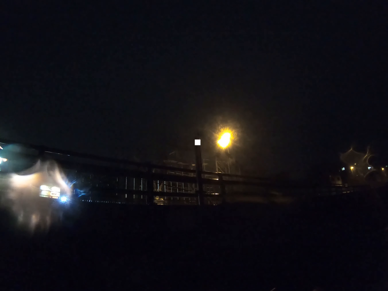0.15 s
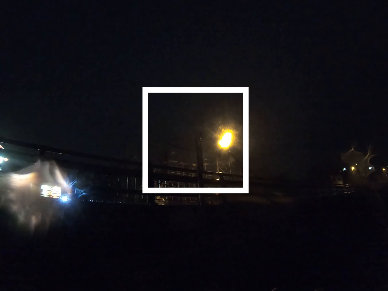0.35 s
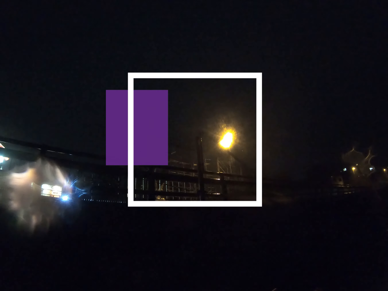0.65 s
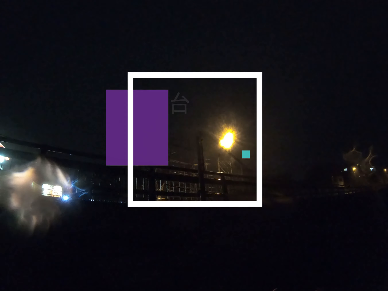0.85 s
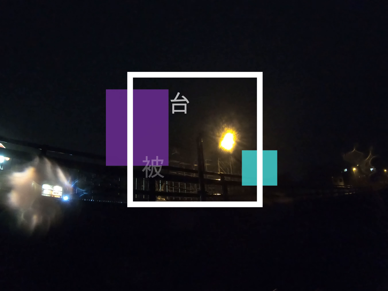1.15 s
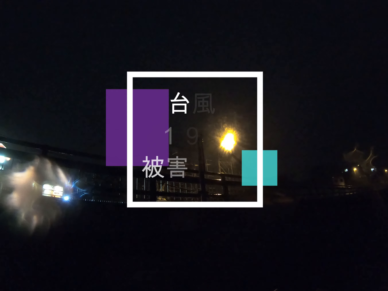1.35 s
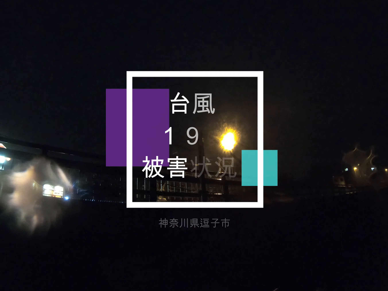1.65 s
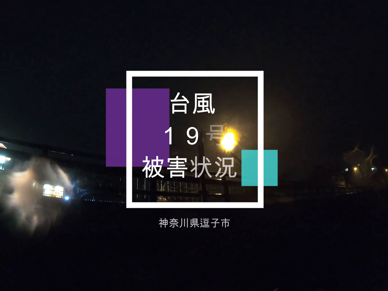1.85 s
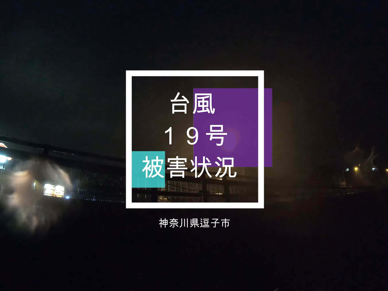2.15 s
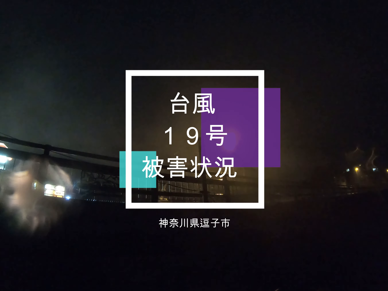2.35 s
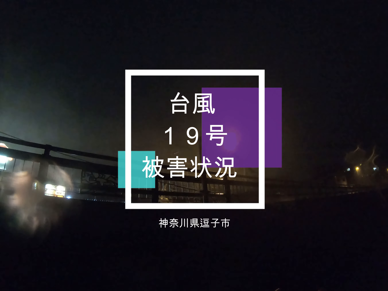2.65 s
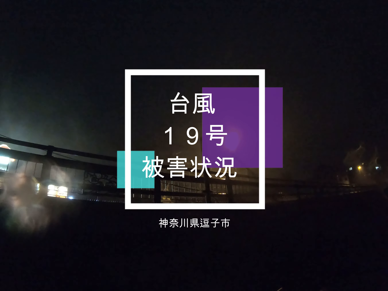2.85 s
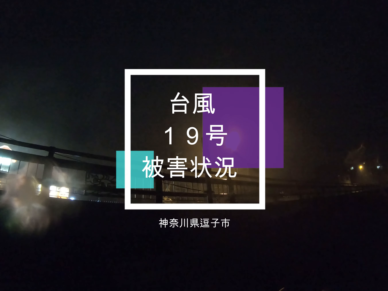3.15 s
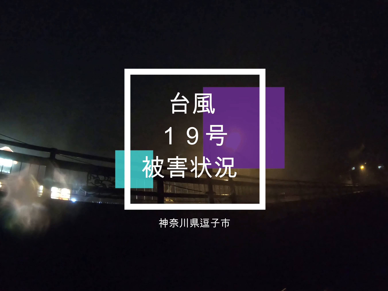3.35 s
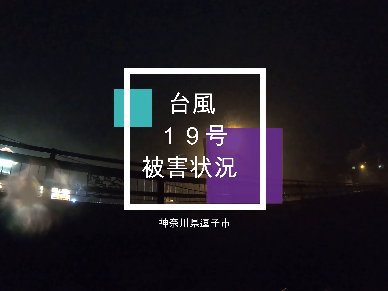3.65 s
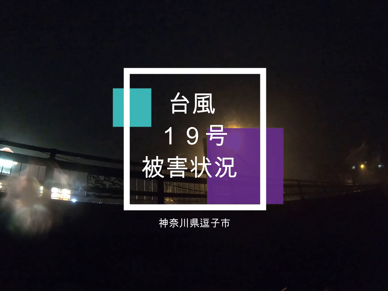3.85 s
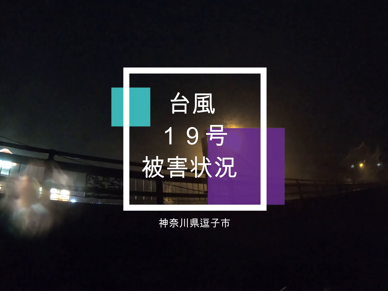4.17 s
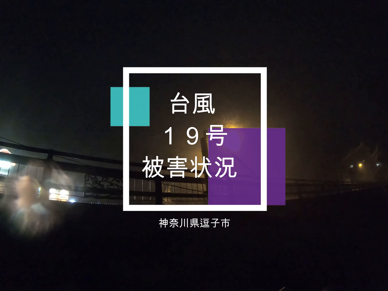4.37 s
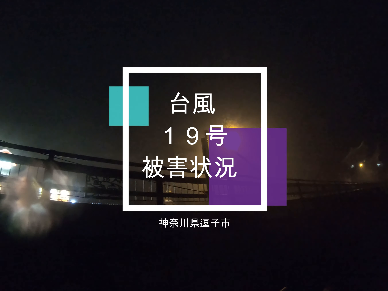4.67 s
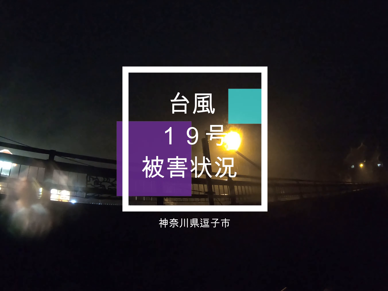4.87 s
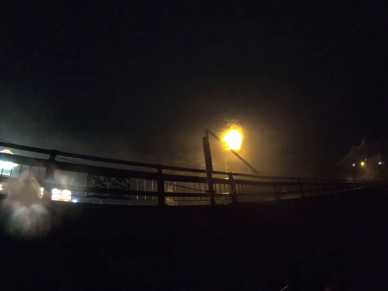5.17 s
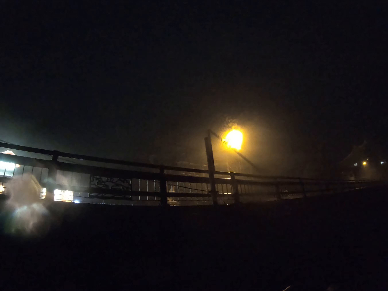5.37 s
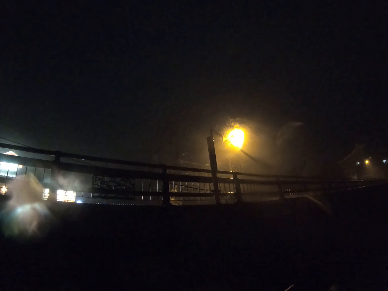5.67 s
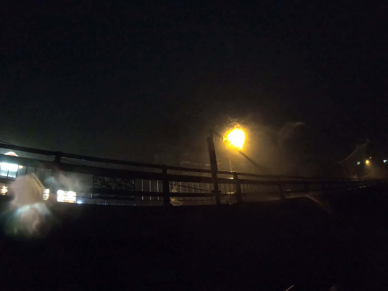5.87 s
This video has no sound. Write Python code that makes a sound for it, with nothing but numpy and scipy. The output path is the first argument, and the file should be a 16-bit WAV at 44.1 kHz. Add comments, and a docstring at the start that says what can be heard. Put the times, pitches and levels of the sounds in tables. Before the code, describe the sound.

Close, rough wind noise dominates: low booming buffets, irregular thuds and torn, crackling gust peaks right on the microphone. Between the blasts, a breathy two-toned howl rises and sinks in nearby rails, with a broad roar and a soft wash of rain and fine spray. A few tiny drops tick on the housing. Open, exposed place, no echo.

```python
"""Heavy low rumble: a typhoon buffets a microphone beside a railing in the open.
Large eddies are shaped noise and short uneven sine bursts; ragged blasts tear across the port as
noise thumps with rasp and crackle on their crests. Behind them two fuzzy bands howl in the railing,
wide patchy noise roars, and rain, spray and mist hiss in higher bands. A few drops tick."""
import sys
import numpy as np
from scipy import signal
from scipy.fft import rfft, irfft, next_fast_len
from scipy.io import wavfile
from scipy.ndimage import uniform_filter1d, minimum_filter1d, map_coordinates

SR = 44100
rng = np.random.default_rng(int(sys.argv[2]) if len(sys.argv) > 2 else 0)


def wav_record(signal):
    """Record a signal, one row per channel, as 16-bit PCM in the file named by sys.argv[1]."""
    frames = np.transpose(np.atleast_2d(signal))
    bounded = np.clip(frames, -1, 1)
    # unit amplitude maps onto the largest positive 16-bit level
    quanta = np.round(bounded * 32767).astype(np.int16)
    wavfile.write(sys.argv[1], SR, quanta)


N = 265437

# Spectrum tables: freq_hz, relative_db. Only the shape counts; the noise is scaled to rms 1.
# large, smaller and smallest eddies on the microphone
RUMBLE_SPECTRUM = [(8, -29), (20, -2.5), (35, -7), (48, -7.5), (62, -0.5), (76, -6), (100, -10), (150, -49),
                   (500, -100)]
CHURN_SPECTRUM = [(40, -17), (78, -5.5), (105, 1), (140, 0), (190, -4), (260, -12), (400, -23.5),
                  (800, -24.5), (2500, -100)]
EDDY_SPECTRUM = [(90, -42), (170, 1), (260, -2), (380, -7), (600, -20), (1000, -17), (1500, -35),
                 (3000, -47), (7000, -100)]
# low push, rasp and spit of a blast: freq_hz, relative_db
THUMP_SPECTRUM = [(12, -25), (35, 1.5), (75, 1.5), (130, 0), (250, 5), (400, -8), (800, -17), (2500, -100)]
TEAR_SPECTRUM = [(120, 3.5), (300, -4), (500, 3), (700, -3.5), (950, -8.5), (1400, -21), (2000, -37),
                 (3200, -38), (5000, -57), (10000, -100)]
CRACKLE_SPECTRUM = [(500, -20), (950, 4), (1400, 1), (1900, -6), (2400, -14), (3300, -20), (5000, -61),
                    (10000, -95)]
# wind all around, rain, and the finer water: freq_hz, relative_db
ROAR_SPECTRUM = [(120, -35), (300, -1.5), (430, 0), (700, -1.5), (830, -5.5), (1200, -10), (1500, -9.5),
                 (2000, -18), (6000, -73)]
RAIN_SPECTRUM = [(500, -6.5), (1100, 5.5), (1600, 1.5), (2100, 1.5), (2550, 0.5), (3100, -1), (3450, -7.5),
                 (3950, -14.5), (4600, -15), (5300, -19.5), (12000, -75)]
SPRAY_SPECTRUM = [(3000, -2.5), (4500, 5), (5400, -4.5), (6100, -2), (6800, -6), (7900, -7), (9300, -16.5),
                  (10100, -15.5), (10900, -14), (12000, -25.5), (15000, -61)]
MIST_SPECTRUM = [(3000, -54), (7000, -1.5), (11000, -4), (12000, -7.5), (13300, -10), (15000, -24)]
# bright rain sheets and airy hiss: freq_hz, relative_db
SQUALL_SPECTRUM = [(1200, -23), (2000, 4), (2700, 6), (3200, -7), (3700, -20), (5000, -44)]
AIR_SPECTRUM = [(7000, -30), (10500, -2), (13000, 2), (14300, -11), (15000, -13)]

# strength of the flow over the microphone: time_s, flow_db
FLOW = [(0.17, -26.5), (0.25, -26), (0.54, -25), (0.68, -18), (1.09, -32.5), (1.62, -26), (1.89, -20.5),
        (2.25, -21.5), (2.56, -14.5), (2.82, -19.5), (3.12, -23.5), (3.66, -27), (3.8, -29), (3.92, -27.5),
        (4.07, -27.5), (4.33, -22.5), (4.65, -20.5), (4.87, -18.5), (4.99, -19), (5.28, -16), (5.53, -23),
        (5.69, -23.5), (6.0, -30)]
# how finely the flow breaks up: time_s, small_eddies_relative_db
BREAKUP = [(0.5, -12), (0.85, -2.5), (1.5, -2), (2.15, 3.5), (2.5, 0), (2.8, -3.5), (3.3, -4.5),
           (4.4, -2.5), (4.58, -13), (4.85, -2), (5.1, 0), (5.35, -6), (5.55, -15), (6.0, -12)]
# single large eddies: centre_s, level_db (before THUD_OFFSET_DB), centre_hz
THUDS = [(0.18, -21.5, 73), (0.444, -20, 70), (0.672, -15, 50), (0.72, -20, 115), (0.777, -20.5, 67.5),
         (1.592, -18, 78), (1.908, -17, 158), (2.057, -17, 179.5), (2.129, -14.5, 135.4), (2.2, -15.5, 261),
         (2.225, -14, 121), (2.25, -17, 36), (2.29, -17, 108), (2.38, -16, 250), (2.444, -17, 137.4),
         (2.46, -16, 278.3), (2.575, -13, 123.4), (2.671, -14, 119), (2.729, -13, 50), (2.831, -16, 114.6),
         (2.876, -17.5, 69.8), (3.044, -19.5, 94), (3.416, -15, 109.7), (3.545, -16, 123), (3.6, -16.5, 36),
         (3.615, -12, 111), (3.73, -17, 34.2), (3.756, -14.5, 135.5), (3.785, -21, 173.6),
         (4.2, -15, 134.7), (4.23, -10.5, 36), (4.245, -16, 99), (4.328, -17, 141.8), (4.393, -18, 89.9),
         (4.796, -15.5, 112.1), (4.876, -15, 120), (4.958, -14, 94), (5.061, -17, 38), (5.09, -14.5, 120.4),
         (5.137, -14, 114.5), (5.188, -19, 195), (5.289, -15, 100), (5.319, -20.5, 259.7),
         (5.717, -13.5, 100), (5.769, -12.5, 119), (5.806, -9.5, 129), (5.872, -12.5, 155),
         (5.925, -18, 167.5)]
# blasts across the port: start_s, hold_s, level_db (before THUMP_OFFSET_DB),
# tear_db and crackle_db (both relative to level_db)
BLASTS = [(0.64, 0.009, -29.5, 10.5, -7), (0.665, 0.011, -21.5, 5, -10.5), (0.683, 0.032, -25, -8, -13),
          (2.198, 0.027, -23, -3, -14), (2.479, 0.0077, -26, 1, -13), (2.601, 0.018, -22.5, -1, -8),
          (2.633, 0.025, -19, -1.5, -14), (2.697, 0.0069, -24, 4.5, -16), (2.815, 0.021, -24.5, -8, -18),
          (2.875, 0.011, -22, -5, -22), (2.951, 0.012, -24, -5, -15), (3.033, 0.011, -22, -2.5, -27),
          (3.552, 0.0079, -19, -2, -18), (3.578, .011, -17.5, -3.5, -14), (3.601, .007, -22, 5, -10),
          (3.63, .016, -18, -2.5, -9), (4.2, 0.028, -24.5, 2.5, -13), (4.237, 0.0094, -27.5, 8, -4),
          (4.305, 0.022, -29.5, 3, -8), (4.416, 0.025, -28.5, 6.5, 1.5), (4.851, 0.022, -23, -1, -11),
          (4.904, .013, -25, 3, -11), (4.953, .018, -26, 0, -2.5), (5.264, 0.0085, -23.5, 2, -7),
          (5.306, 0.0064, -29, -2, -16), (5.336, .008, -22.5, 4, -11), (5.354, .008, -25, 5.5, -1.5),
          (5.76, 0.0097, -18, -3, -18), (5.79, 0.014, -17, 3, -5.5), (5.813, 0.01, -19, 1.5, -11),
          (5.851, 0.0085, -19.5, 2, -18)]
# gusts in the railing: centre_s, spread_s (to 1/e power), low_hz, low_db, high_hz, high_db
HOWL_GUSTS = [(0.329, 0.17, 606.4, -32, 980, -39.5), (0.578, 0.17, 537, -32.5, 985, -38),
              (1.301, 0.057, 595, -40, 974, -37), (1.68, 0.53, 569.3, -29.5, 977.5, -41),
              (2.5, 0.23, 561, -43, 962, -35.5), (3.216, 0.11, 620, -50, 1005, -38),
              (3.482, 0.13, 633.6, -33, 950, -34.5), (3.75, 0.04, 490, -33.5, 957, -50),
              (4.027, 0.19, 598, -50, 956, -38), (4.43, 0.18, 590, -37.5, 1050, -33),
              (4.7, 0.076, 590, -37, 982, -34), (5.019, 0.2, 582, -36, 947, -34.5),
              (5.6, .17, 588, -45, 941, -42)]
# full width at half amplitude of the low and high howl noise: width_hz
HOWL_WIDTHS_HZ = (260, 165)
# strength of the wind all around: time_s, wind_db (before ROAR_OFFSET_DB)
WIND = [(0.26, -37), (0.53, -29.5), (0.83, -39.5), (1.14, -48), (1.52, -31.5), (2.59, -29.5), (2.88, -32),
        (3.1, -35.5), (3.47, -32.5), (3.65, -41), (3.94, -34.5), (4.34, -33.5), (4.96, -31.5), (5.81, -32),
        (6.0, -37)]
# driven water: time_s, rain_db, spray_db (before their offsets)
DOWNPOUR = [(0.1, -39.5, -55.5), (0.18, -40, -57.5), (0.64, -40, -56), (0.92, -41.5, -59.5),
            (1.86, -39.5, -54.5), (2.38, -41.5, -56), (2.6, -39, -55), (2.8, -42.5, -60.5),
            (3.12, -43, -60.5), (3.2, -40.5, -56.5), (3.45, -39, -55), (3.54, -39.5, -52), (3.64, -42, -57),
            (3.8, -44.5, -62), (4.27, -38.5, -56), (4.95, -36, -55), (5.33, -39, -59), (5.79, -37.5, -60),
            (5.8, -47, -66), (5.9, -39.5, -64), (6.0, -42.5, -64)]
# bright sheets of rain: centre_s, spread_s (to 1/e power), level_db
SQUALLS = [(3.36, 0.13, -49), (4.55, 0.2, -53), (5.64, 0.098, -38.5), (5.92, 0.087, -43)]
# airy hiss of the fastest gusts: centre_s, spread_s (to 1/e power), level_db
AIR_GUSTS = [(2.28, .16, -70), (2.52, 0.1, -67), (3.5, .13, -73)]
# water flung against the housing: start_s, level_db (before DROP_OFFSET_DB), centre_hz
DROPS = [(3.604, -32.5, 3160), (5.641, -49, 6800), (5.801, -36.5, 3800), (5.812, -46, 4260)]

# levels at the reference flow; growth in dB per dB of flow
FLOW_REF_DB = -20
RUMBLE_DB, RUMBLE_GROWTH = -23, 0.48
CHURN_DB, CHURN_GROWTH = -22.5, 0.55
EDDY_DB, EDDY_GROWTH = -26.5, 0.73
# lumps in the flow: limits in dB of flow, before growth
LUMP_RATE_HZ, LARGE_LUMP_FLOW_DB, SMALL_LUMP_FLOW_DB = 13, 4, 3.16
THUD_OFFSET_DB, THUD_SIGMA_S = -2.5, 0.019
THUD_SCATTER, THUD_SCATTER_RATE_HZ = 0.325, 130  # rms of log turning speed
BLAST_ATTACK_S, BLAST_RELEASE_S = 0.0087, 0.011  # amplitude time constants
THUMP_OFFSET_DB, TEAR_GROWTH = 3, 1.45  # TEAR_GROWTH: dB of tear and crackle per dB of swell
FLUTTER_RATE_HZ, FLUTTER_DB = 53, -0.5
CRACKLE_GRAIN_DB, CRACKLE_GRAIN_RATE_HZ = 3, 540
HOWL_SWAY, HOWL_TREMBLE = 0.0153, 0.01495  # rms shares of pitch, slow and quick
ROAR_OFFSET_DB, RAIN_OFFSET_DB, SPRAY_OFFSET_DB = -0.54, 5, 8
MIST_DB, SPRAY_REF_DB, MIST_GROWTH = -67, -55.5, 1.8  # mist level at spray level; dB per dB
DROP_OFFSET_DB = 6
CEILING, LIMITER_S = 0.79, 0.008
START_S, TOP_HZ = 0.058, 15100


def amp(db):
    """Decibels to gain."""
    return 10 ** (np.asarray(db) / 20)


def unit(x):
    """Scale to rms 1."""
    return x / np.sqrt(np.mean(x ** 2) + 1e-20)


def clock():
    """Time of each sample in seconds."""
    return np.arange(N) / SR


def curves(rows):
    """Interpolate each column after the time to one value per sample."""
    time_s, *columns = np.transpose(rows)
    return [np.interp(clock(), time_s, column) for column in columns]


def wobble(rate_hz):
    """Smooth random curve at rms 1, rate_hz knots a second."""
    knots = rng.standard_normal(4096)
    return unit(map_coordinates(knots, [clock() * rate_hz + 2], mode="wrap"))


def white():
    """Fresh white noise."""
    return rng.standard_normal(N)


def filtered(x, response):
    """Multiply the spectrum of x by a response of frequency in Hz."""
    size = next_fast_len(N + SR // 2)
    freq_hz = np.fft.rfftfreq(size, 1 / SR)
    return irfft(rfft(x, size) * response(freq_hz), size)[:N]


def coloured(x, spectrum):
    """Shape x by a spectrum table on a log frequency axis, at rms 1."""
    freq_hz, relative_db = np.transpose(spectrum)

    def response(hz):
        return amp(np.interp(np.log(hz + 1), np.log(freq_hz + 1), relative_db))

    return unit(filtered(x, response))


def even(x, span_s):
    """Level the slow drift to rms 1 over a sliding window; fast flutter stays."""
    window = signal.windows.hann(int(span_s * SR) + 3)
    power = np.abs(signal.fftconvolve(x ** 2, window / window.sum(), "same"))
    return x / np.sqrt(power + 1e-6)


def patchy(depth_db):
    """Noise with patches of random gain in time and frequency; depth_db is rms."""
    z = signal.stft(white(), nperseg=1024)[2]
    field = uniform_filter1d(rng.standard_normal(z.shape), size=7, axis=0)
    field = uniform_filter1d(field, size=8, axis=1)
    return signal.istft(z * amp(depth_db * unit(field)), nperseg=1024)[1][:N]


def ragged(pressure, depth):
    """Small eddies break loose in puffs on the crests of the large ones."""
    return white() * np.exp(depth * np.tanh(pressure))


def swells(rows):
    """Gain of bell-shaped swells, summed in power."""
    power = sum(amp(db) ** 2 * np.exp(-((clock() - centre_s) / spread_s) ** 2)
                for centre_s, spread_s, db in rows)
    return np.sqrt(power)


def buffeting():
    """Large eddies rumble, smaller ones churn; the smallest grow fastest as the flow speeds up."""
    flow_db = curves(FLOW)[0] - FLOW_REF_DB
    breakup_db, = curves(BREAKUP)
    rumble = even(coloured(white(), RUMBLE_SPECTRUM), span_s=0.81)
    churn = even(coloured(white(), CHURN_SPECTRUM), span_s=0.082)
    puffs = ragged(unit(rumble + churn), depth=0.31)
    eddies = even(coloured(puffs, EDDY_SPECTRUM), span_s=0.05)
    large_db = flow_db + LARGE_LUMP_FLOW_DB * np.tanh(wobble(LUMP_RATE_HZ))
    small_db = flow_db + SMALL_LUMP_FLOW_DB * np.tanh(wobble(LUMP_RATE_HZ))
    rumble_gain = amp(RUMBLE_DB + RUMBLE_GROWTH * large_db)
    churn_gain = amp(CHURN_DB + CHURN_GROWTH * small_db)
    eddy_gain = amp(EDDY_DB + breakup_db + EDDY_GROWTH * small_db)
    return rumble_gain * rumble + churn_gain * churn + eddy_gain * eddies


def thuds():
    """A single eddy rocks the microphone for a few uneven turns at its own centre frequency."""
    now = clock()
    # log-normal turning speed, mean near 1
    speed = np.exp(THUD_SCATTER * (wobble(THUD_SCATTER_RATE_HZ) - THUD_SCATTER / 2))
    swirl_s = np.cumsum(speed) / SR
    out = np.zeros(N)
    for (centre_s, db, hz), start_turn in zip(THUDS, rng.random(len(THUDS))):
        near = slice(*np.searchsorted(now, [centre_s - 0.1, centre_s + 0.1]))
        bell = np.exp(-((now[near] - centre_s) / THUD_SIGMA_S) ** 2 / 2)
        turns = hz * (swirl_s[near] - swirl_s[near].mean()) + start_turn
        push = amp(db + THUD_OFFSET_DB) * bell
        out[near] += np.sqrt(2) * push * np.sin(2 * np.pi * turns)
    return out


def blasts():
    """Low fluttering thumps; torn air rasps and crackles on their crests. Attack beats release."""
    push_power, tear_power, crackle_power = np.zeros((3, N))
    now = clock()
    for start_s, hold_s, db, tear_db, crackle_db in BLASTS:
        near = slice(*np.searchsorted(now, [start_s - 0.1, start_s + 0.2]))
        before = np.maximum(start_s - now[near], 0) / BLAST_ATTACK_S
        after = np.maximum(now[near] - start_s - hold_s, 0) / BLAST_RELEASE_S
        swell = np.exp(-before - after)
        sharp_swell = swell ** TEAR_GROWTH
        push_power[near] += (amp(db) * swell) ** 2
        tear_power[near] += (amp(db + tear_db) * sharp_swell) ** 2
        crackle_power[near] += (amp(db + crackle_db) * sharp_swell) ** 2
    thump = even(coloured(white(), THUMP_SPECTRUM), span_s=0.036)
    tear = even(coloured(ragged(thump, depth=0.55), TEAR_SPECTRUM), span_s=0.036)
    grains = ragged(thump, depth=1.0) * amp(CRACKLE_GRAIN_DB * wobble(CRACKLE_GRAIN_RATE_HZ))
    crackle = even(coloured(grains, CRACKLE_SPECTRUM), span_s=0.033)
    flutter = amp(FLUTTER_DB * np.tanh(wobble(FLUTTER_RATE_HZ)))
    low = amp(THUMP_OFFSET_DB) * np.sqrt(push_power) * thump
    return flutter * (low + np.sqrt(tear_power) * tear + np.sqrt(crackle_power) * crackle)


def howling():
    """Rails and posts shed vortices in two fuzzy bands; pitch glides between gusts and wavers."""
    centre_s, spread_s, low_hz, low_db, high_hz, high_db = np.transpose(HOWL_GUSTS)
    sway = wobble(6)  # shared by both bands
    out = np.zeros(N)
    for width_hz, hz, db in zip(HOWL_WIDTHS_HZ, (low_hz, high_hz), (low_db, high_db)):
        fuzz = unit(filtered(white(), lambda f: 1 / (1 + (2 * f / width_hz) ** 2)))
        waver = 1 + HOWL_SWAY * sway + HOWL_TREMBLE * wobble(17)
        pitch_hz = np.interp(clock(), centre_s, hz) * waver
        phase = 2 * np.pi * np.cumsum(pitch_hz) / SR
        # reversed fuzz serves as a second noise in quadrature
        band = fuzz * np.cos(phase) + fuzz[::-1] * np.sin(phase)
        out += swells(zip(centre_s, spread_s, db)) * even(band, span_s=0.22)
    return out


def storm():
    """Wide wind roar, sheets of rain, grainy spray, and mist that grows faster than the spray."""
    wind_db, = curves(WIND)
    rain_db, spray_db = curves(DOWNPOUR)
    sheets = wobble(13)  # shared by rain and spray
    roar_gain = amp(wind_db + ROAR_OFFSET_DB + 0.43 * wobble(5.3))
    roar = roar_gain * coloured(patchy(depth_db=1.6), ROAR_SPECTRUM)
    rain_gain = amp(rain_db + RAIN_OFFSET_DB + 0.58 * sheets)
    rain = rain_gain * coloured(patchy(depth_db=0.23), RAIN_SPECTRUM)
    droplets = patchy(depth_db=1.3) * amp(0.62 * wobble(600))
    spray_gain = amp(spray_db + SPRAY_OFFSET_DB + 0.17 * sheets)
    spray = spray_gain * coloured(droplets, SPRAY_SPECTRUM)
    mist_gain = amp(MIST_DB + MIST_GROWTH * (spray_db - SPRAY_REF_DB))
    mist = mist_gain * coloured(white() * amp(2 * wobble(500)), MIST_SPECTRUM)
    return roar + rain + spray + mist


def squalls():
    """A passing sheet of rain swells in a narrow, sizzling band of patchy noise."""
    return swells(SQUALLS) * coloured(patchy(depth_db=1.5), SQUALL_SPECTRUM)


def airy_hiss():
    """The fastest gusts add a high grainy hiss that swells and fades."""
    return swells(AIR_GUSTS) * coloured(white() * amp(2 * wobble(400)), AIR_SPECTRUM)


def drops():
    """A drop on the housing ticks: a noise band with a sharp onset and a 60 dB fall in 27 ms."""
    out = np.zeros(N)
    for start_s, db, hz in DROPS:
        age_s = np.maximum(clock() - start_s, 0)
        splash = unit(filtered(white(), lambda f: np.exp(-(np.log((f + 1) / hz) / 0.2) ** 2)))
        onset = 1 - np.exp(-age_s / 0.00065)
        out += amp(db + DROP_OFFSET_DB - 60 * age_s / 0.027) * onset * splash
    return out


def scene():
    """All sources sum at one microphone."""
    near = buffeting() + thuds() + blasts()
    behind = howling() + storm() + squalls() + airy_hiss() + drops()
    return (near + behind)[None]


def record(dry):
    """Silence, a 2 ms opening, a limiter that ducks around peaks over CEILING, a cut at TOP_HZ."""
    opening = np.clip((clock() - START_S) / 0.002, 0, 1)
    x = dry[0] * opening
    size = int(LIMITER_S * SR)
    needed_gain = CEILING / np.maximum(np.abs(x), CEILING)
    gain = uniform_filter1d(minimum_filter1d(needed_gain, size), size)
    return filtered(x * gain, lambda hz: hz < TOP_HZ)[None]


dry = scene()
out = record(dry)
wav_record(out)
```